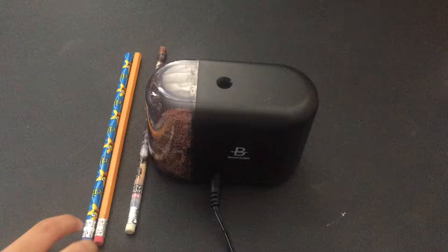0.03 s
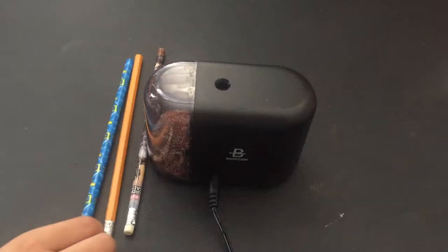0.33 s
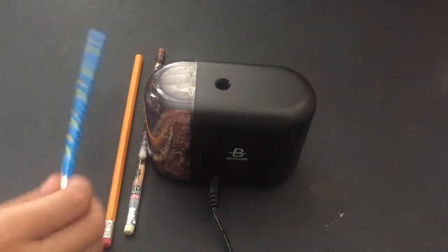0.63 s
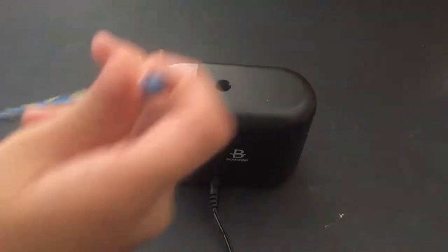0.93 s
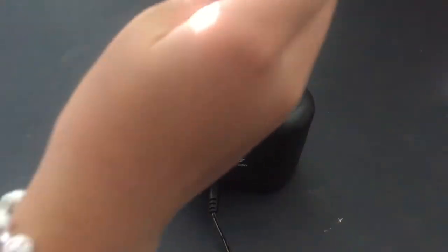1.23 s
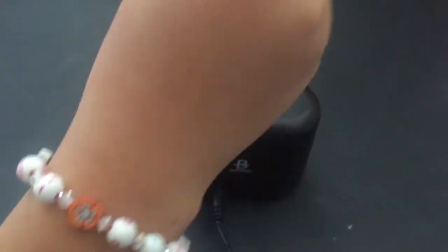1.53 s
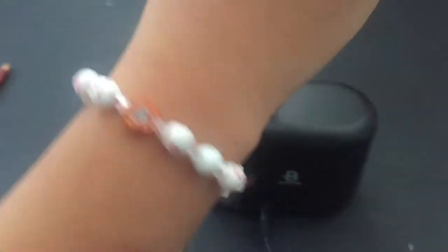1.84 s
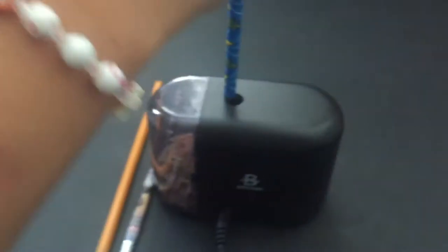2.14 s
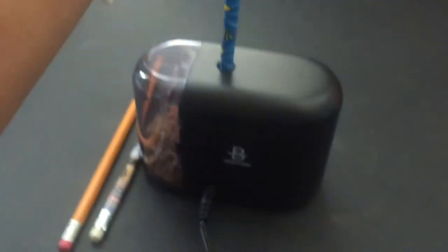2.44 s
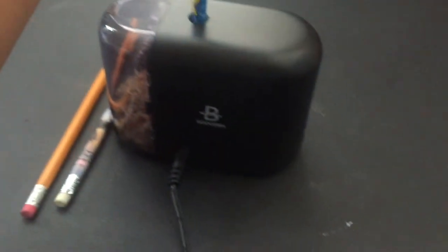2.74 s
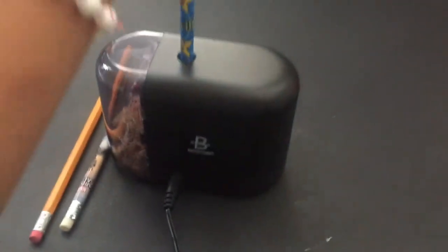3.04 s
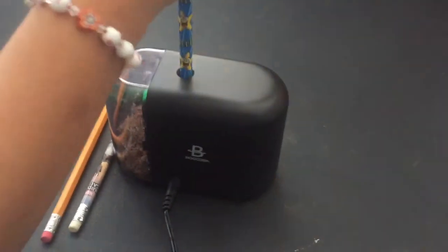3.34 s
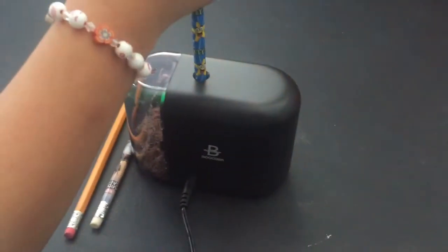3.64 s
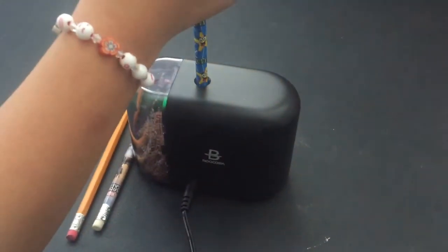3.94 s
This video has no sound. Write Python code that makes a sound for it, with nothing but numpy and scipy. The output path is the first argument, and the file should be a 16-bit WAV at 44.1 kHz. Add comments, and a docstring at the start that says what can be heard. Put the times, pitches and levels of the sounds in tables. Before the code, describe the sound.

An electric pencil sharpener grinds a pencil, close up in a small, quiet room. First the pencil slides softly on a table and ticks in the plastic opening; then a switch snaps and the motor whines loudly.

```python
"""An electric pencil sharpener on a table in a small, quiet room, heard close up on one microphone.
Over the room's rumble a pencil slides and knocks on the table top, and a hand drags across it.
The pencil ticks and scrapes in the plastic opening. At 3.2 s the switch snaps, the gears whine up
and the cutter grinds the wood; the motor sags as the pencil is pushed harder."""
import sys
import numpy as np
from scipy import signal
from scipy.fft import rfft, irfft
from scipy.io import wavfile
from scipy.ndimage import map_coordinates

SR = 44100
rng = np.random.default_rng(int(sys.argv[2]) if len(sys.argv) > 2 else 0)


def master_out(mix):
    """Clip the mix to full scale and print it as 16-bit PCM to the path in sys.argv[1]."""
    frames = np.transpose(np.atleast_2d(mix))
    ceiling = np.clip(frames, -1, 1)
    pcm = np.round(ceiling * 32767).astype(np.int16)
    wavfile.write(sys.argv[1], SR, pcm)


N = 176400
T = np.arange(N) / SR
TEETH = 8  # per turn of the shaft
# gears sagging under load: t/s, tooth rate f/Hz, level/dB of each of harmonics 1 to 4
GEAR_MESH = [(3.28, 1938, -68, -35.5, -43, -58), (3.302, 2019, -53, -41, -47, -51),
             (3.314, 2109, -88, -31.5, -50, -57), (3.36, 2110, -34.5, -27, -43, -45),
             (3.392, 2120, -57, -25.5, -50, -44), (3.436, 2082, -42, -31.5, -35, -42),
             (3.482, 2052, -58, -35.5, -41.5, -46), (3.55, 2073, -40.5, -26, -36.5, -43.5),
             (3.572, 2047, -41, -35.5, -37, -48), (3.582, 2001, -43.5, -32, -35.5, -55),
             (3.642, 1999, -42, -35.5, -34.5, -56), (3.662, 1976, -43, -38, -39, -56),
             (3.68, 1975, -45, -42, -36, -71), (3.698, 1951, -41, -47, -37, -44),
             (3.716, 1958, -31, -60, -38.5, -54), (3.732, 1924, -33.5, -44, -45, -51),
             (3.756, 1967, -37, -40, -35, -64), (3.774, 1983, -34.5, -35, -35.5, -59),
             (3.818, 1923, -48, -59, -48, -58), (3.83, 1942, -52, -45, -40, -58),
             (3.858, 1928, -46, -53, -49, -49), (3.906, 1883, -39.5, -33.5, -37, -51),
             (3.936, 1819, -43.5, -33, -53, -43.5), (3.964, 1893, -40, -36.5, -48, -55),
             (3.992, 1920, -38.5, -50, -42, -49), (4.0, 1914, -44, -47, -50, -64)]


def from_db(db):
    """Decibels to gain."""
    return 10 ** (np.asarray(db) / 20)


def rms_one(x):
    """Scale to unit rms."""
    return x / np.sqrt(np.mean(x ** 2) + 1e-20)


def in_time(rows):
    """Each column after the first as a curve in time."""
    times, *columns = np.transpose(rows)
    return [np.interp(T, times, column) for column in columns]


def during(rows, fade_s=0.0089):
    """1 between a table's first and last time, fading outside."""
    start, end = rows[0][0], rows[-1][0]
    return np.interp(T, [start - fade_s, start, end, end + fade_s], [0, 1, 1, 0])


def envelope(levels, gain_db=0):
    """Gain that follows a table of t/s, level/dB and fades outside it."""
    return from_db(in_time(levels)[0] + gain_db) * during(levels)


def coloured(x, points):
    """Shape x by a relative spectrum that falls away steeply outside the table; rms 1."""
    hz, db = np.transpose(points)
    f = np.maximum(np.fft.rfftfreq(N, 1 / SR), 1)
    shape = from_db(np.interp(np.log(f), np.log(hz), db))
    skirts = np.minimum(f / hz[0], 1) ** 3 * np.minimum(hz[-1] / f, 1) ** 3
    return rms_one(irfft(rfft(x) * shape * skirts, N))


def resonant(x, peaks):
    """Lift narrow resonances out of a broad sound."""
    for hz, width_hz, db in peaks:
        r = np.exp(-np.pi * width_hz / SR)
        band = signal.lfilter([1, 0, -1], [1, -2 * r * np.cos(2 * np.pi * hz / SR), r * r], x + 1e-18)
        x = x + (from_db(db) - 1) * (1 - r * r) / 2 * band
    return x


def drift(rate_hz):
    """Random motion, mostly slower than rate_hz; rms 1."""
    lowpass = signal.butter(2, rate_hz, fs=SR, output="sos")
    return rms_one(signal.sosfilt(lowpass, rng.standard_normal(N + SR))[SR:])


def wavering_note(hz, width_hz):
    """A note that wavers in strength and pitch."""
    phase = 2 * np.pi * hz * T
    return drift(width_hz) * np.sin(phase) + drift(width_hz) * np.cos(phase)


def grains(per_s, spread_db):
    """Random tiny fractures of uneven size."""
    hits = (rng.random(N) < per_s / SR) * rng.choice([-1, 1], N)
    return hits * from_db(spread_db * np.minimum(rng.exponential(1, N), 5))


def friction(colour, peaks=(), *, per_s, spread_db):
    """Dense grains through the resonances of the rubbed thing; rms 1."""
    return coloured(resonant(grains(per_s, spread_db), peaks), colour)


def burst(low_hz, high_hz, t60_s):
    """A dying puff of band noise."""
    t = T[:SR // 4]
    band = signal.butter(2, [low_hz, high_hz], "band", fs=SR, output="sos")
    return .5 * rms_one(signal.sosfilt(band, rng.standard_normal(len(t)))) * from_db(-60 * t / t60_s)


def struck(times, level_db, response):
    """Play a response at each time and level."""
    hits = np.zeros(N)
    hits[(times * SR).astype(int)] = from_db(level_db)
    return signal.fftconvolve(hits, response)[:N]


def rung(times, level_db, modes):
    """Blows ring a body's modes, each with slightly different strength."""
    t = T[:SR // 4]
    sound = 0
    for k, (hz, db, t60_s) in enumerate(modes):
        mode = (-1) ** k * np.sin(2 * np.pi * hz * t) * from_db(-60 * t / t60_s)
        sound += struck(times, level_db + db + rng.normal(0, 1.3, len(times)), mode)
    return sound


def room_tone(waver_db=2.5, hiss_db=-81):
    """The room's wavering rumble and the microphone's steady hiss."""
    levels = [(.113, -100), (.128, -64.5), (.75, -61.5), (.95, -62), (1.25, -59), (1.8, -60), (2.75, -65),
              (3.2, -64.5), (4.0, -59)]  # rumble: t/s, level/dB
    room_colour = [(22, -32), (40, -6.5), (58, 11), (72, -3.5), (90, -7.5), (115, -9), (145, -15),
                   (190, -8.5), (260, -0.5), (310, -9), (420, -16.5), (700, -19.5), (1000, -20.5),
                   (1900, -30.5), (5800, -42.5), (15500, -55)]  # rumble spectrum: f/Hz, level/dB
    hiss_colour = [(2500, -1.5), (15500, -11.5)]  # hiss spectrum: f/Hz, level/dB
    rumble = envelope(levels, waver_db * drift(11.8)) * coloured(rng.standard_normal(N), room_colour)
    hiss = from_db(hiss_db) * during(levels) * coloured(rng.standard_normal(N), hiss_colour)
    return rumble + hiss


def room_echo(sound, gain_db=-11.5):
    """Near walls return a short, diffuse tail."""
    tail = burst(244, 7360, t60_s=0.097)
    return from_db(gain_db) * signal.fftconvolve(sound, tail / np.linalg.norm(tail))[:N]


def handling():
    """Dull handling noise carried through the table."""
    levels = [(1.9, -64), (2.058, -50), (2.134, -56.5), (2.166, -47.5), (2.67, -60), (2.79, -85),
              (2.976, -55.5), (3.02, -117), (3.102, -44.5), (3.186, -80), (3.195, -51)]  # hand movement: t/s, level/dB
    colour = [(50, 0), (90, 7), (170, -0.5), (300, -5), (600, -17), (1000, -23.5), (2000, -32.5)]  # its spectrum: f/Hz, level/dB
    return envelope(levels, gain_db=-3) * friction(colour, per_s=510, spread_db=2)


def hand_judder(top_hz=1213, end_hz=173, sweep_s=0.0011, decay_s=0.0023):
    """Each slip of a dragging hand sends a bending wave through the table top, highs arriving first."""
    slips = [(2.039, -42.5), (2.161, -38), (2.176, -39), (2.1902, -40), (2.208, -39), (2.222, -42.5),
             (2.234, -39), (2.251, -51), (2.272, -42), (2.304, -40.5), (2.3199, -42), (2.344, -45.5),
             (3.094, -48), (3.113, -48)]  # slips of the hand: t/s, peak level/dB
    t = T[:SR // 20]
    hz = end_hz + (top_hz - end_hz) * np.exp(-t / sweep_s)
    wave = np.sin(2 * np.pi * np.cumsum(hz) / SR) * (t / decay_s) ** 2 * np.exp(-2 * t / decay_s)
    return struck(*np.transpose(slips), wave / np.abs(wave).max())


def pencil_on_table():
    """The pencil rumbles as it slides, its edges rasp, its barrel sings, and it knocks as it tips over."""
    slide = [(0.26, -57), (0.33, -68.5), (0.42, -53), (0.5, -57.5), (0.555, -66.5)]  # sliding: t/s, level/dB
    slide_colour = [(120, -7.5), (250, 3), (600, 3), (1000, -8), (1850, -16), (3000, -28)]  # its spectrum: f/Hz, level/dB
    edges = [(0.265, -63.5), (0.32, -71), (0.44, -55), (0.47, -69), (0.56, -68.5)]  # rolling edges: t/s, level/dB
    edge_colour = [(1000, 0.5), (1850, 0), (2500, -11), (5000, -22.5), (14000, -38)]  # their spectrum: f/Hz, level/dB
    peaks = [(2086, 60, 3)]  # resonance of pencil on table: f/Hz, width/Hz, boost/dB
    barrel = [(0.33, -64), (0.41, -62.5)]  # singing barrel: t/s, level/dB
    knocks = [(0.4322, -42), (0.4406, -46)]  # knocks on the table: t/s, level/dB
    modes = [(410, -2, 0.017), (660, -1, 0.022), (1876, -1, 0.026)]  # what they ring: f/Hz, level/dB, t60/s
    rumble = envelope(slide, gain_db=-0.5) * friction(slide_colour, per_s=2700, spread_db=1.5)
    rasp = envelope(edges, gain_db=1.4) * friction(edge_colour, peaks, per_s=5000, spread_db=1.5)
    note = envelope(barrel) * wavering_note(hz=1584, width_hz=38)
    return rumble + rasp + note + rung(*np.transpose(knocks), modes)


def pencil_in_opening():
    """The pencil scrapes the plastic opening; a faint hiss swells just before the switch snaps."""
    stretches = [
        [(2.358, -43.5), (2.415, -48.5), (2.465, -58), (2.512, -53), (2.57, -63.5)],
        [(3.066, -61), (3.09, -48), (3.104, -55.5), (3.19, -66.5), (3.21, -56)],
    ]  # two stretches of sound, the second ending in the swell: t/s, level/dB
    colour = [(400, -3), (800, -5), (1550, -2), (3000, -7), (4600, -12), (5500, -16.5), (9000, -30.5),
              (15000, -41)]  # their spectrum: f/Hz, level/dB
    peaks = [(1540, 60, 4), (2210, 57, 5.4), (2870, 66, 6)]  # resonances of pencil in opening: f/Hz, width/Hz, boost/dB
    return sum(envelope(levels, gain_db=-4.5) * friction(colour, peaks, per_s=6900, spread_db=2.5)
               for levels in stretches)


def clicks():
    """Each contact of pencil or switch rings the housing and adds a crack and a bright tick."""
    contacts = [(0.256, -55.5, -44.5, -45.5), (1.696, -61, -53.5, -53), (1.7, -61, -52, -54.5),
                (1.708, -68, -72, -60), (1.9756, -37, -43.5, -55.5), (2.081, -65, -53.5, -70),
                (2.248, -79, -59.5, -65), (2.358, -56, -42, -70), (2.364, -54, -35, -69),
                (2.403, -37.5, -41, -58), (2.413, -38, -59, -66), (2.865, -49, -61, -70),
                (2.936, -49.5, -50.5, -63), (3.086, -43.5, -45.5, -59), (3.2136, -41.5, -44, -33)]  # contacts: t/s, level/dB of ring, of crack, of tick
    modes = [(1020, -1, 0.042), (1140, 3.5, 0.018), (1283, -0.5, 0.027), (1610, -5, 0.027),
             (2180, -10.5, 0.02), (2920, -19, .027)]  # modes of housing and pencil: f/Hz, level/dB, t60/s
    times, ring_db, crack_db, tick_db = np.transpose(contacts)
    crack = struck(times, crack_db, burst(1400, 3540, t60_s=0.027))
    tick = struck(times, tick_db, burst(4200, 12400, t60_s=0.018))
    return rung(times, ring_db, modes) + crack + tick


def table_shake():
    """The housing shakes the table: a low, unsteady hum."""
    levels = [(3.22, -49.5), (3.254, -37), (3.314, -56), (3.346, -42), (3.588, -57), (3.744, -49.5),
              (3.768, -60), (3.822, -50), (4.0, -50)]  # strength of the shaking: t/s, level/dB
    pitch = [(3.22, 82.1), (3.3, 113.3), (3.35, 77.4), (3.42, 110.5), (3.52, 78.2), (3.7, 70.6),
             (4.0, 66.22)]  # its rate: t/s, f/Hz
    gain = envelope(levels, gain_db=4) * (1 + 0.38 * drift(29.6))
    phase = 2 * np.pi * np.cumsum(in_time(pitch)[0]) / SR
    return gain * np.sin(phase + 0.58 * drift(20.5))


def shaft_angle(start_s=3.213, spin_up_s=0.021, jitter=0.0018):
    """The motor spins up, then sags under load; the shaft's angle in radians."""
    running = 1 - np.exp(-np.maximum(T - start_s, 0) / spin_up_s)
    tooth_hz = in_time(GEAR_MESH)[0] * running * (1 + jitter * drift(85))
    return 2 * np.pi * np.cumsum(tooth_hz / TEETH) / SR


def shaft_tones(shaft, flutter=0.5, wander_rad=0.72):
    """Weak, fluttering tones of shaft and gears."""
    multiples = [1, 3, 7, 9.15, 12, 12.2, 15, 15.25, 16.35, 32.6]  # pitch of each tone: multiple of the shaft rate
    levels = [-56.5, -57.5, -60.5, -51, -56, -47, -53, -46.5, -50.5, -58]  # strength of each tone: level/dB
    tones = 0
    for k, db in zip(multiples, levels):
        gain = from_db(db) * (1 + flutter * drift(24.4))
        tones += gain * np.sin(k * shaft + wander_rad * k / TEETH * drift(18))
    return np.sqrt(2) * tones * during(GEAR_MESH, fade_s=0.052)


def gear_run_up(shaft, roughness=0.21):
    """The gears growl at three times the shaft rate as they gather speed."""
    levels = [(3.24, -54), (3.262, -45), (3.3, -61)]  # growl: t/s, level/dB
    return envelope(levels) * (1 + roughness * drift(120)) * np.sin(3 * shaft)


def gear_whine(shaft, gain_db=0.82, play_rad=0.11, roughness=0.21, flutter=0.1):
    """Meshing teeth sound six harmonics, blurred by their play under the cut."""
    fifth = [(3.75, -67), (3.93, -49), (4.0, -60)]  # thin fifth harmonic: t/s, level/dB
    entry = [(3.27, -20), (3.32, 0)]  # harmonics 3 to 6 come in as the gears reach speed: t/s, level/dB
    fifth_db, = in_time(fifth)
    entry_db, = in_time(entry)
    harmonic_db = in_time(GEAR_MESH)[1:] + [fifth_db, fifth_db - 9]
    mesh = TEETH * shaft + play_rad * drift(150)
    whine = 0
    for k, db in enumerate(harmonic_db, 1):
        unsteady = 1 + roughness * drift(106) + flutter * drift(40)
        whine += from_db(db + gain_db + entry_db * (k > 2)) * unsteady * np.sin(k * mesh)
    return np.sqrt(2) * whine * during(GEAR_MESH, fade_s=0.052)


def tooth_buzz(shaft, play_rad=0.06, change_hz=6.85, points=128):
    """Uneven tooth surfaces pass once a turn: a buzz whose partials slowly trade strength."""
    turns = (shaft + play_rad * drift(40)) / (2 * np.pi)
    place = [turns * points % points]
    buzz = 0
    for _ in range(3):
        weight = drift(change_hz)
        surface = rng.standard_normal(points)
        buzz += weight * map_coordinates(surface, place, order=3, mode="grid-wrap")
    return rms_one(buzz)


def wood_bites():
    """The cutter bites into the pencil with a thud and a crack."""
    bites = [(3.281, -28, -32), (3.341, -21, -43), (3.3977, -45, -25), (3.412, -40, -22)]  # bites: t/s, level/dB of thud, of crack
    times, thud_db, crack_db = np.transpose(bites)
    thuds = struck(times, thud_db, burst(860, 1400, t60_s=0.026))
    cracks = struck(times, crack_db, burst(2980, 3500, t60_s=0.026))
    return thuds + cracks


def wood_groans():
    """The pencil groans against the cutter in short, rough notes."""
    groans = [(3.579, .08, 774, -47.5), (3.707, 0.05, 691, -42), (3.866, 0.035, 771, -38.5),
              (3.909, .08, 1018, -41)]  # groans: middle t/s, length/s, f/Hz, level/dB
    return sum(from_db(db) * np.exp(-2 * ((T - middle) / length) ** 2) * wavering_note(hz, width_hz=22.3)
               for middle, length, hz, db in groans)


def cutter_grind(shaft, blade_depth=0.11, blades_per_turn=0.29, buzz_db=-8):
    """Chips break off, pulsing with the blades; they and the tooth buzz drive the housing in four bands."""
    growl = [(3.22, -58), (3.47, -48.5), (3.64, -53), (3.71, -44.5), (3.76, -49), (3.92, -42.5)]  # deep growl of the cut: t/s, level/dB
    grind = [(3.218, -47, -62, -62), (3.226, -41, -48, -60.5), (3.258, -43, -36.5, -50),
             (3.352, -36.5, -34.5, -45), (3.404, -42.5, -33, -47.5), (3.466, -38, -40, -52),
             (3.488, -40.5, -41.5, -51), (3.526, -44.5, -35, -49.5), (3.59, -45.5, -42.5, -50.5),
             (3.82, -40, -41, -51), (3.936, -38, -40, -52), (3.97, -41.5, -41.5, -50.5),
             (4.0, -38, -41.5, -52.5)]  # grinding: t/s, level/dB of low mids, of upper mids, of treble
    peaks = [(901, 30, 7.5), (1087, 29, 4.5), (1332, 14, 8), (3110, 77, 7), (3410, 77, 7.5),
             (4145, 57, 11.5), (8420, 80, 8.5)]  # narrow housing resonances: f/Hz, width/Hz, boost/dB
    # spectrum of the driven housing in each band: f/Hz, level/dB
    deep = [(130, -39), (220, -18.5), (400, -6), (520, -7), (600, -4), (700, 5.5), (790, 0), (900, -6)]
    low_mids = [(600, -32), (800, -10), (900, 1.5), (1100, 3.5), (1400, -3.5), (1750, -1.5), (2600, -8.5)]
    upper_mids = [(1200, -9), (1750, -7.5), (2050, -5), (2300, -5), (2600, -12.5), (3000, -4.5), (3300, 0),
                  (3600, -3), (4050, -3.5), (4500, -5), (5200, -18), (7000, -35)]
    treble = [(3500, -23), (4600, 0.5), (5400, 16), (6000, 21), (6600, 14.5), (7400, 12.5), (8300, 13),
              (9200, 7), (10500, 1.5), (13500, 5), (16000, 1)]
    bands = [(deep, 0.5), (low_mids, 0), (upper_mids, 1.5), (treble, 10)]  # spectrum, gain/dB
    cutting = during(grind)
    sound = 0
    for level_db, (colour, gain_db) in zip(in_time(growl) + in_time(grind), bands):
        chips = rms_one(grains(per_s=9000, spread_db=2.5))
        chips *= 1 + blade_depth * np.sin(blades_per_turn * shaft)
        drive = (chips + from_db(buzz_db) * tooth_buzz(shaft)) * cutting
        sound += from_db(level_db + gain_db) * coloured(resonant(drive, peaks), colour)
    duty_gain = np.sqrt(np.mean(cutting))  # sets the rms over the cut alone
    return sound * duty_gain * during(grind, fade_s=0.005)


def scene():
    """Handling at the table with its short echo, then the sharpener, over the room tone; mono."""
    near = pencil_on_table() + pencil_in_opening() + handling() + hand_judder() + clicks()
    room = room_echo(near) + room_tone()
    shaft = shaft_angle()
    gears = gear_whine(shaft) + shaft_tones(shaft) + gear_run_up(shaft)
    sharpener = gears + cutter_grind(shaft) + table_shake() + wood_bites() + wood_groans()
    return (near + room + sharpener)[None]


def record(dry):
    """The microphone loses the deepest bass; the top is cut steeply."""
    low_cut = signal.butter(2, 38, "high", fs=SR, output="sos")
    high_cut = signal.ellip(10, .1, 70, 15600, fs=SR, output="sos")
    return signal.sosfilt(high_cut, signal.sosfilt(low_cut, dry))


dry = scene()
out = record(dry)
master_out(out)
```